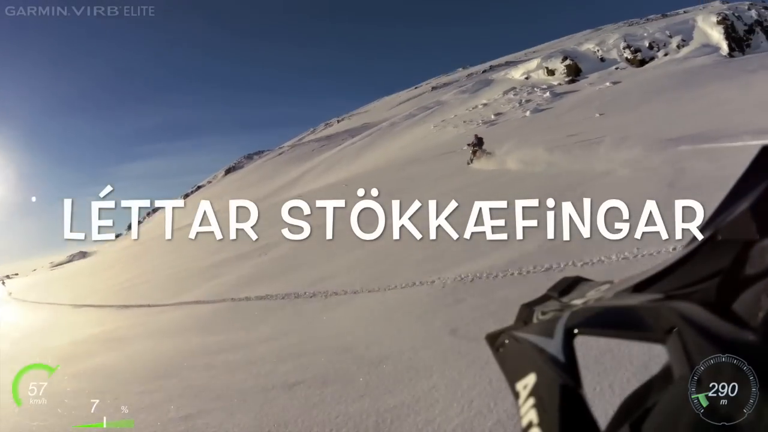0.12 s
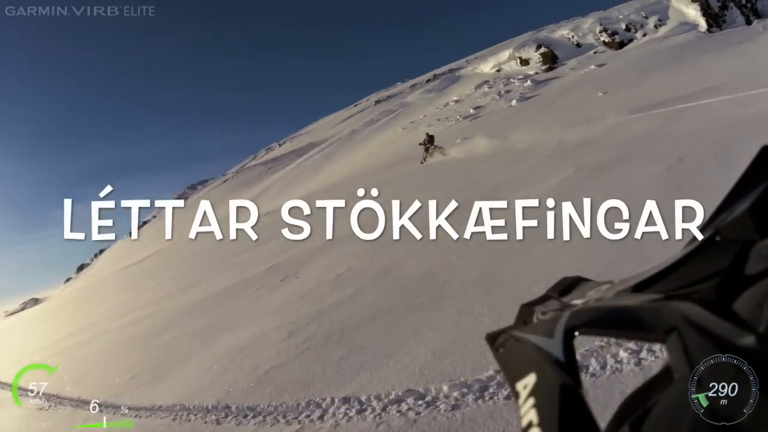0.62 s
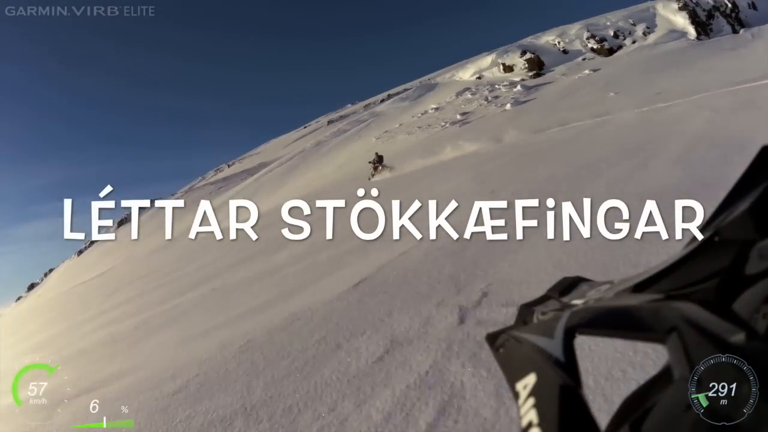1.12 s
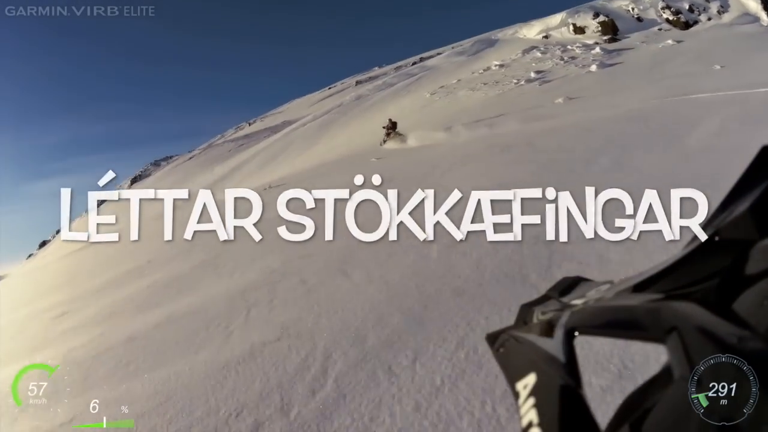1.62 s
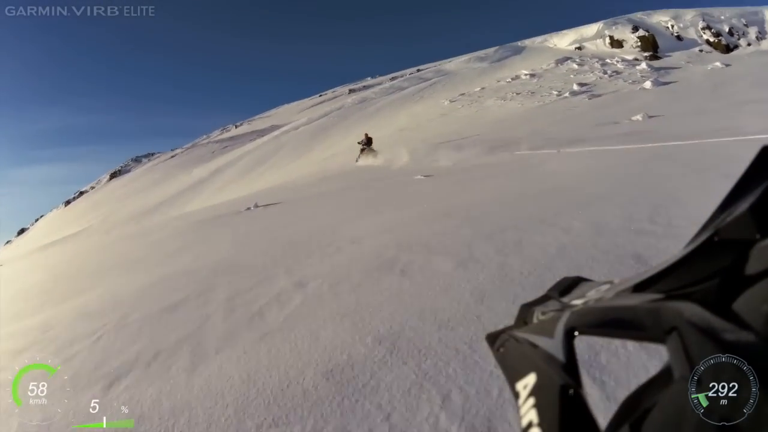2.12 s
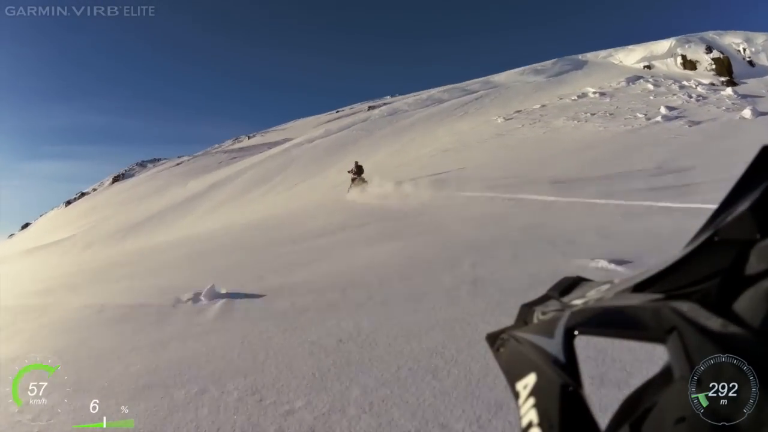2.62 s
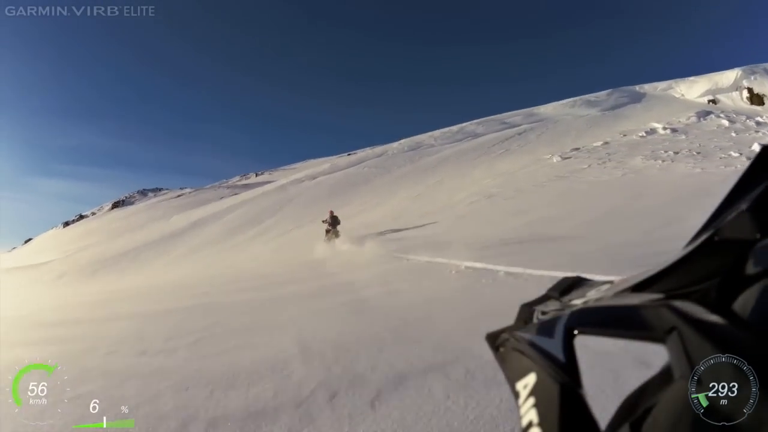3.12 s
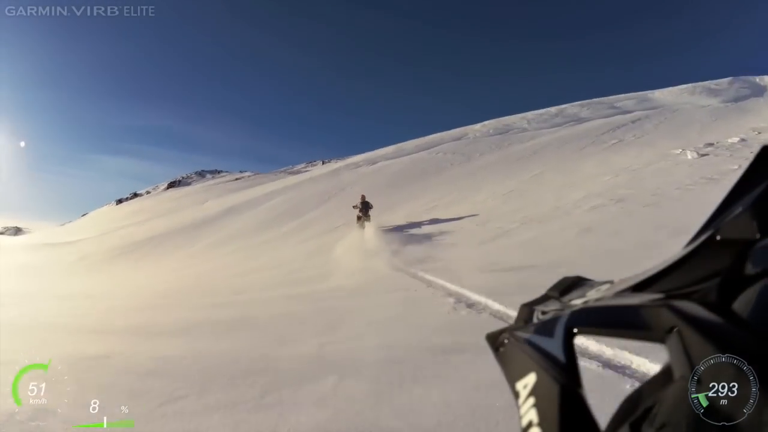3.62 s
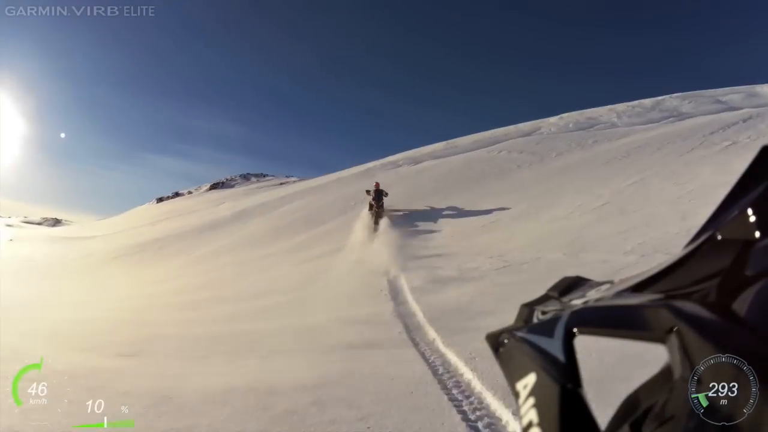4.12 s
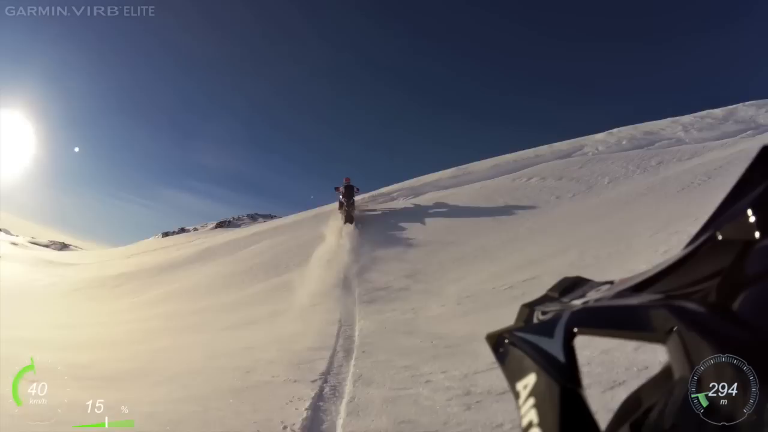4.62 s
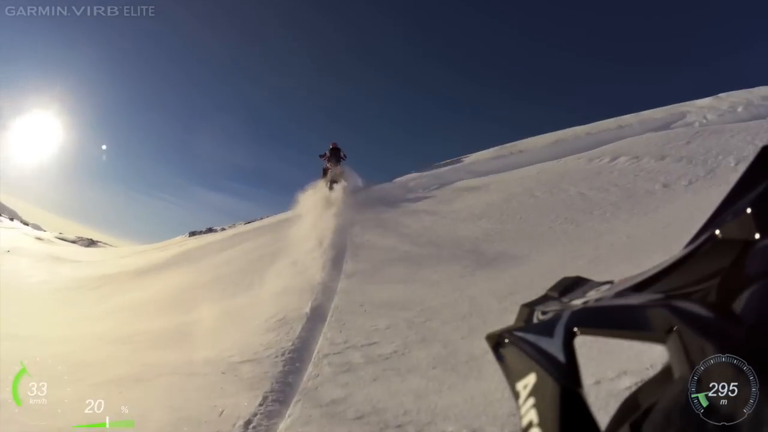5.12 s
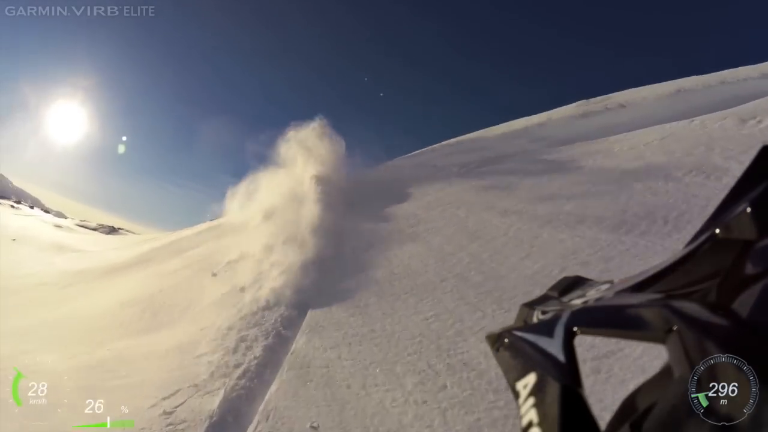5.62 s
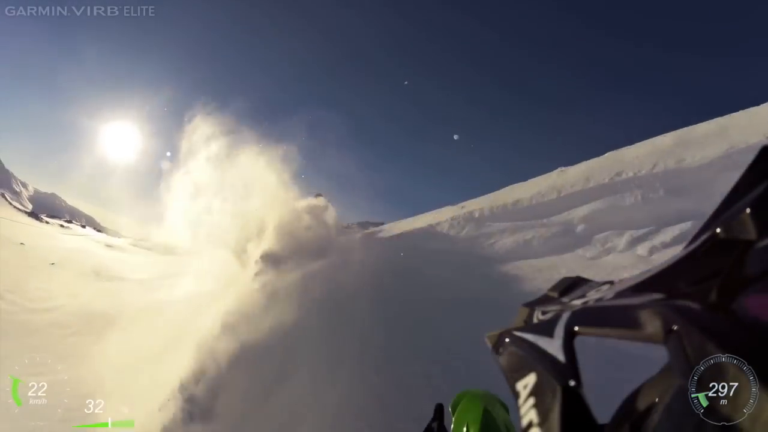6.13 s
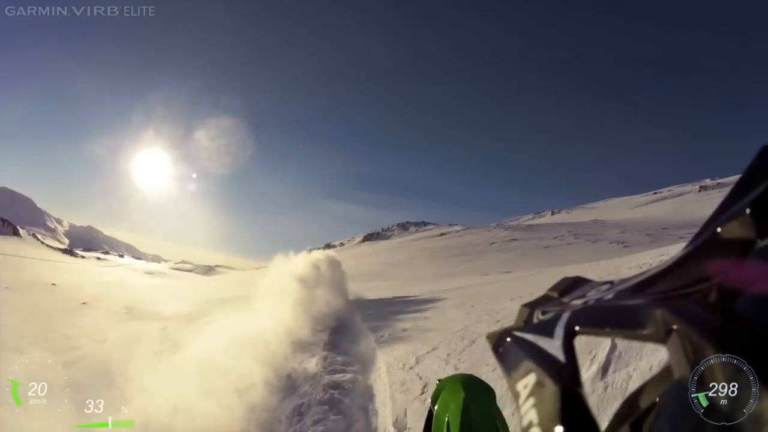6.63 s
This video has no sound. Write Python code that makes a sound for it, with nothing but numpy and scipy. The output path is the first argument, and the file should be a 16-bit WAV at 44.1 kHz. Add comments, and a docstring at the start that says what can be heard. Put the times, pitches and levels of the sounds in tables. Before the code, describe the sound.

A single-cylinder snow bike engine drones and climbs, drops off throttle, sputters unevenly, then pulls again under heavy buffeting head wind.

```python
"""Snow bike in a head wind

A single-cylinder four-stroke engine pulls, coasts off the throttle and pulls again, heard inside a closed housing.
Firing pulses and gas noise ring resonances as its bark; cosines make the drone, shaped noise the whirr and cracks.
The head wind is patchy coloured noise with slaps and an edge roar; the overloaded input adds treble clicks.
The input squeezes the loudest sounds and cuts off the highest peaks."""
import sys
import numpy as np
from scipy import signal
from scipy.fft import rfft, irfft, next_fast_len
from scipy.io import wavfile

SR = 44100
rng = np.random.default_rng(int(sys.argv[2]) if len(sys.argv) > 2 else 0)


def store_pcm(level_fs):
    """Save levels as 16-bit WAV."""
    pcm = np.round(np.clip(level_fs, -1, 1) * 32767).astype(np.int16)
    wavfile.write(sys.argv[1], SR, np.atleast_2d(pcm).T)


def nominal_scale(level):
    """Amplitude ratio for a level in decibels (scalar or array-like)."""
    x = np.asarray(level, float) / 20
    return 10 ** x


N = 298116


def rms_one(x):
    """Scales a sound to an rms of 1."""
    return x / np.sqrt(np.mean(x ** 2) + 1e-20)


def in_time(rows):
    """Joins the columns of a table by straight lines in time."""
    s, *columns = np.transpose(rows)
    return [np.interp(np.arange(N) / SR, s, column) for column in columns]


def at_hz(points, hz):
    """Reads a (frequency, level) table on a log-frequency axis."""
    table_hz, level_db = np.transpose(points)
    return np.interp(np.log(hz), np.log(table_hz), level_db)


def drift(rate_hz):
    """Slow random wandering of rms 1: noise smoothed twice, made at every 40th sample."""
    r = np.exp(-2 * np.pi * rate_hz * 40 / SR)
    noise = rng.standard_normal(N // 40 + 2002)
    slow = signal.lfilter([1], [1, -2 * r, r * r], noise)[2000:]   # skip the filter's start
    return np.interp(np.arange(N) / 40, np.arange(len(slow)), rms_one(slow))


def resonance(x, hz, width_hz):
    """Something that rings at one pitch: a two-pole peak with gain 1 on top."""
    r = np.exp(-np.pi * width_hz / SR)
    poles = [1, -2 * r * np.cos(2 * np.pi * hz / SR), r * r]
    return signal.lfilter([(1 - r * r) / 2, 0, (r * r - 1) / 2], poles, x)


def low_pass(x, order, hz):
    """Dulls a sound above the given frequency."""
    return signal.sosfilt(signal.butter(order, hz, fs=SR, output="sos"), x)


def turbulence(spectrum, eddies_db, patchy_db):
    """Coloured noise in octave bands: all share the passing eddies, each also flickers on its own."""
    size = next_fast_len(N)
    hz = np.fft.rfftfreq(size, 1 / SR) + 1e-3
    noise = nominal_scale(at_hz(spectrum, hz)) * rfft(rng.standard_normal(N), size)
    octaves = np.clip(np.log2(hz), 5, 13)
    out = 0
    for octave in np.arange(5, 14):
        share = np.clip(1 - np.abs(octaves - octave), 0, 1)   # neighbouring bands overlap
        band = irfft(noise * share, size)[:N]
        out = out + band * nominal_scale(patchy_db * drift(2.3))
    return rms_one(out * nominal_scale(eddies_db))


# engine speed: (time [s], firing rate [1/s])
ENGINE_SPEED = [(0, 62), (.2, 60.5), (.44, 66.6), (.71, 68.8), (.95, 73.8), (1.17, 74.5), (1.39, 71.6),
                (1.62, 72.5), (1.82, 79), (2.0, 77), (2.21, 73.7), (2.45, 77), (2.53, 77.2), (2.86, 76.6),
                (2.96, 70.6), (3.07, 69.6), (3.35, 65), (4.04, 46), (4.6, 50.1), (5.08, 41), (5.45, 45),
                (5.6, 56), (5.79, 53.4), (5.97, 52.4), (6.08, 54.7), (6.252, 62.8), (6.488, 62.4),
                (6.674, 66.8), (6.76, 66.9)]
# engine load: (time [s], level of the firing [dB], extra level of the intake drone [dB])
ENGINE_LOAD = [(0, -30, -6), (.75, -26, -2), (1.85, -23, 2), (2.3, -22.5, 1), (2.5, -22.5, 0),
               (2.85, -23, -1), (2.91, -31, 3), (3.12, -32, 2), (3.28, -41, 12), (3.5, -41, 8),
               (4.35, -38, -1), (5.05, -40, 3), (5.2, -33, -4), (5.45, -40, -5), (5.63, -29, -6),
               (5.86, -28.5, -1), (6.0, -24.5, -1), (6.17, -28.5, 5), (6.3, -31, 4), (6.44, -30.5, -4),
               (6.57, -29.5, 4), (6.76, -30, -1)]
# throttle: (time [s], opening [0-1], uneven burning [0-1])
THROTTLE_HAND = [(0, 1, .1), (2.86, 1, 0), (2.9, 0, 0), (3.25, 0, 0), (3.4, 0, 1), (4.0, .6, 1),
                 (5.5, .6, 1), (5.62, 1, .6), (5.85, 1, .4), (5.97, 1, .25), (6.25, 1, .05), (6.76, 1, 0)]


def riding():
    """How the engine is ridden: the firing count with a slight wobble in speed, the load and the throttle."""
    firing_hz, = in_time(ENGINE_SPEED)
    load_db, intake_db = in_time(ENGINE_LOAD)
    throttle, uneven = in_time(THROTTLE_HAND)
    cycle = np.cumsum(firing_hz * (1 + .0015 * drift(6.0))) / SR - .37
    return cycle, firing_hz, load_db, intake_db, throttle, uneven


# exhaust and bodywork rung by each firing: (frequency [Hz], width [Hz], relative level [dB])
EXHAUST_MODES = [(310, 220, -8), (590, 130, -2), (790, 90, -1), (1090, 130, -3), (1310, 150, -4),
                 (1870, 260, -10), (2420, 380, -18), (2950, 400, -19)]


def bark(cycle, firing_hz, uneven, puff, puff_s, uneven_db, late_s):
    """Each firing sends a pulse and a dying puff of gas noise into the resonances; part throttle burns unevenly."""
    low_pipe_hz, rasp_hz = 900, 1400   # upper limits of the low pipe resonances and of the middle ones
    at = np.flatnonzero(np.diff(np.floor(cycle)))
    chance = rng.standard_normal((len(at), 2))
    slack = 1 + 3 * uneven[at]
    late = np.clip(at + late_s * SR * slack * chance[:, 0], 0, N - 1).astype(int)
    pulses = np.zeros(N)
    pulses[late] = nominal_scale(uneven_db * slack * chance[:, 1])
    fade = np.exp(-1 / (puff_s * SR))
    gas = signal.lfilter([1], [1, -fade], pulses) * rng.standard_normal(N)
    push = rms_one(pulses) + puff * rms_one(gas) * [[1], [2.8]]   # more gas noise for the rasp
    push = low_pass(push, 4, 1530)   # the housing wall
    hot = np.interp(firing_hz, [60, 74], [0, 1])
    out = 0
    for k, (hz, width_hz, db) in enumerate(EXHAUST_MODES):
        lag_s = .0009 * max(np.log2(hz / rasp_hz), 0)   # higher rasp resonances speak later
        drive = np.roll(push[int(hz > rasp_hz)], round(lag_s * SR))
        rung = resonance(drive, hz, width_hz)
        if low_pipe_hz < hz < rasp_hz:   # slower running cools the gas, so the pitch sags
            cool = resonance(drive, .91 * hz, width_hz)
            rung = hot * rung + (1 - hot) * cool
        sign = -1 if hz < low_pipe_hz else (-1) ** k   # the low ones start together, with a suction
        out = out + sign * nominal_scale(db) * rung
    return rms_one(out)


# drone: (multiple of the firing rate, level on throttle [dB], level coasting [dB])
DRONE_ORDERS = [(2, -11, -1.5), (3, .5, -1), (4, -10, 9), (5, 0, -16.5), (6, -11, -7.5)]
# colour given by the airbox: (frequency [Hz], gain [dB])
AIRBOX_COLOUR = [(110, 7), (170, -8), (225, 2), (270, -7), (330, 3.5), (400, 0.5), (480, -2)]


def drone(cycle, firing_hz, throttle):
    """Low multiples of the firing rate as cosines through the airbox; their balance shifts with the throttle."""
    lagged = cycle - .0006 * firing_hz   # all dip together 0.6 ms after each firing
    out = 0
    for multiple, open_db, shut_db in DRONE_ORDERS:
        multiple = round(multiple)
        level_db = throttle * open_db + (1 - throttle) * shut_db
        level_db = level_db + at_hz(AIRBOX_COLOUR, multiple * firing_hz) + 1.6 * drift(10.0)
        out = out - nominal_scale(level_db) * np.cos(2 * np.pi * multiple * lagged)
    return np.sqrt(2) * out


# colour of the whirr: (frequency [Hz], relative level [dB per Hz])
WHIRR_SPECTRUM = [(1000, 2.5), (2000, 8.5), (3000, -3), (4200, -4.5), (4800, -14), (5400, -20.5),
                  (7000, -28), (13000, -60)]
# drive effort: (time [s], level of the whirr [dB])
DRIVE_EFFORT = [(0, -43.5), (1.2, -36.5), (2.2, -42), (3.3, -44), (4.2, -49), (5.0, -51), (5.6, -51),
                (5.95, -45), (6.27, -44.5), (6.5, -42.5), (6.76, -45.5)]


def whirr(cycle, rush_db, throttle):
    """Valve gear and chain as noise, louder with effort and air over the chain; throbs with crank and firing."""
    throb_db = 1.8 * np.cos(4 * np.pi * cycle) + 2.0 * np.cos(2 * np.pi * cycle)
    air_db = 0.15 * (rush_db - rush_db.mean())
    gear = nominal_scale(air_db) * turbulence(WHIRR_SPECTRUM, throb_db, patchy_db=1.5)
    # a cover rings with the valve gear under throttle
    cover = rng.standard_normal(N)
    for _ in range(2):
        cover = resonance(cover, hz=5300, width_hz=540)
    cover_db = -31.5 + throb_db + 3.0 * drift(3.0)
    return nominal_scale(in_time(DRIVE_EFFORT)[0]) * (gear + throttle * nominal_scale(cover_db) * rms_one(cover))


# hard single firings at part throttle that crack in the bodywork: (time [s], strength [dB])
HARD_FIRINGS = [(4.324, -29), (4.35, -21.5), (4.6253, -33), (5.047, -34), (5.075, -33), (5.101, -30),
                (5.124, -27), (5.1532, -23.5), (5.2038, -24), (5.25, -26.5), (5.2728, -39)]
# bodywork rung by a crack: (frequency [Hz], width [Hz], relative level [dB])
BODYWORK_MODES = [(1570, 400, -1), (2360, 370, -6), (3200, 780, -13), (4780, 900, -14)]


def cracks():
    """Each crack is a dying rattle that rings the bodywork, each time in another balance, dulled by the housing."""
    s, strength_db = np.transpose(HARD_FIRINGS)
    chance = rng.standard_normal((len(s), len(BODYWORK_MODES)))
    rattle = .003 * SR   # samples in which a rattle dies to 1/e
    out = 0
    for k, (hz, width_hz, db) in enumerate(BODYWORK_MODES):
        hits = np.full(N, 1e-18)
        hits[(s * SR).astype(int)] = nominal_scale(strength_db + db + 3.5 * chance[:, k])
        fading = signal.lfilter([1], [1, -np.exp(-1 / rattle)], hits)
        noise = fading * rng.standard_normal(N) / np.sqrt(rattle / 2)
        out = out + resonance(noise, hz, width_hz) * SR / (2 * np.pi * width_hz)
    return low_pass(out, 5, 3500)


# head wind, its rush strong while the port faces into it: (time [s], buffet level [dB], rush level [dB])
WIND_LEVELS = [(0, -23, -13), (.5, -22.5, -19), (1.0, -27.5, -16), (1.5, -22, -12.5), (1.75, -18.5, -15.5),
               (2.3, -19, -18), (2.5, -18, -28), (2.9, -21, -34), (3.25, -23.5, -37), (3.75, -19.5, -37.5),
               (4.8, -22.5, -32.5), (5.1, -22, -37), (5.55, -21, -33), (5.9, -26, -31.5), (6.2, -26.5, -35),
               (6.76, -26, -32.5)]
# gusts: (peak time [s], buffet swell [dB], rush swell [dB], length [s])
WIND_GUSTS = [(0.723, 4.5, 0, 0.094), (1.193, 6, 3, 0.24), (1.37, 5.5, 3.5, 0.33), (1.704, 5.5, -2, 0.058),
              (1.981, 7.5, -4, 0.084), (2.347, 0, 0, 0.086), (2.502, 0, 8, 0.11), (3.213, 8, 0.5, 0.053),
              (3.332, 5.5, 4.5, 0.2), (3.463, 6.5, 6.5, 0.4), (3.81, 3.5, 7, 0.069), (3.902, 4.5, 1, 0.21),
              (4.27, -4.5, 7.5, 0.043), (4.762, 2, -2.5, 0.33), (5.195, 1, 10, 0.3), (5.524, 1, -4, 0.05),
              (6.478, 6, 5.5, 0.092)]


def head_wind():
    """Levels of buffet and rush in dB: steady wind plus gusts that come a little faster than they go."""
    levels_db = np.array(in_time(WIND_LEVELS))
    rise = 0.41   # share of a gust's length before its peak
    for s, buffet_db, rush_db, length in WIND_GUSTS:
        corners = [s - rise * length, s, s + (1 - rise) * length]
        shape = np.interp(np.arange(N) / SR, corners, [0, 1, 0])
        levels_db = levels_db + np.outer([buffet_db, rush_db], shape)
    return levels_db


# colour of the buffeting: (frequency [Hz], relative level [dB per Hz])
BUFFET_SPECTRUM = [(25, -37), (50, -5.5), (100, 2), (160, 5), (300, 3.5), (500, -2.5), (900, -25),
                   (2000, -56.5), (5000, -98.5)]


def buffeting(buffet_db, eddies):
    """The wind's low rumble: noise shaken by the shared eddies and by a slower drift of its own."""
    shaking_db = 0.71 * eddies + 0.88 * drift(14.0)
    return nominal_scale(buffet_db) * turbulence(BUFFET_SPECTRUM, shaking_db, patchy_db=0.68)


# colour of the rush: (frequency [Hz], relative level [dB per Hz])
RUSH_SPECTRUM = [(60, -43), (200, -8), (400, 1), (650, 2), (1000, -5), (1600, -15), (2500, -27),
                 (4000, -46), (7000, -86), (13000, -110)]


def rushing(rush_db, eddies):
    """Air rushing over the housing: higher noise shaken by the shared eddies."""
    return nominal_scale(rush_db) * turbulence(RUSH_SPECTRUM, 1.0 * eddies, patchy_db=.9)


# single eddies that slap the port: (time [s], strength [dB])
STRONG_SLAPS = [(3.314, -8.5), (3.463, -13), (3.52, -18), (3.615, -14), (3.668, -13), (4.138, -17),
                (4.186, -13), (4.254, -10.5), (4.31, -16), (4.406, -14.5), (4.488, -20), (4.587, -11),
                (4.682, -11.5), (4.821, -29), (4.872, -21), (5.562, -21), (5.746, -13), (5.826, -14)]


def slaps(buffet_db, per_s, small_db, cavity_hz, width_hz):
    """Eddies slap the microphone port, many small ones at random and a few strong; the cavity rings briefly."""
    sizes = nominal_scale(3.32 * np.minimum(rng.exponential(1, N), 4)) * rng.choice([-1, 1], N)
    hits = sizes * (rng.random(N) < per_s / SR) * nominal_scale(buffet_db + small_db)
    for s, strength_db in STRONG_SLAPS:
        hits[round(s * SR)] = nominal_scale(strength_db)
    soft = low_pass(hits + 1e-18, 3, 1100)
    return resonance(soft, cavity_hz, width_hz) * SR / (np.pi * width_hz)


# air over the edge of the housing: (time [s], level [dB])
EDGE_LEVEL = [(0, -26), (.3, -41.5), (.8, -43.5), (1.1, -23), (1.35, -19.5), (1.6, -33.5), (2.2, -36.5),
              (2.6, -41), (6.76, -60)]


def edge_roar(eddies):
    """A broad roar of air over the edge: noise twice through one wide resonance, shaken by the eddies."""
    roar = rng.standard_normal(N)
    for _ in range(2):
        roar = resonance(roar, hz=850, width_hz=600)
    roar = low_pass(roar, 4, 4200)   # the housing wall
    return nominal_scale(in_time(EDGE_LEVEL)[0] + 0.62 * eddies) * rms_one(roar)


# sharp clicks of the overloaded input: (time [s], strength [dB])
OVERLOAD_CLICKS = [(0.0767, -50), (0.1675, -54), (0.5806, -47), (0.733, -53), (0.817, -42.5), (0.8605, -41),
                   (1.129, -53), (1.1588, -53), (1.2117, -45.5), (1.2256, -38.5), (1.2665, -40.5),
                   (1.37, -44), (1.3893, -43), (1.444, -44), (1.486, -39), (1.6113, -43.5), (1.6344, -41),
                   (1.728, -42), (1.959, -55.5), (1.985, -58), (2.015, -61.5), (2.0278, -55.5),
                   (2.0752, -41.5), (2.148, -46.5), (2.269, -44), (2.376, -48), (2.5545, -48)]


def overload_clicks(rush_db):
    """Clicks of the overloaded input in a treble band, with fainter random ones that follow the rush."""
    s, strength_db = np.transpose(OVERLOAD_CLICKS)
    chosen = rng.random(N) < 50 / SR   # about 50 faint clicks a second
    hits = chosen * rng.standard_normal(N) * nominal_scale(rush_db - 20) + 1e-18
    hits[(s * SR).astype(int)] = nominal_scale(strength_db + 28.0) * rng.choice([-1, 1], len(s))
    return signal.sosfilt(signal.butter(2, [3500, 6050], "band", fs=SR, output="sos"), hits)


def scene():
    """Adds up the engine, the wind at the housing and the clicks of the input."""
    cycle, firing_hz, load_db, intake_db, throttle, uneven = riding()
    buffet_db, rush_db = head_wind()
    eddies = drift(24.0)   # shared by the layers of wind
    engine = nominal_scale(load_db) * bark(cycle, firing_hz, uneven, puff=.27, puff_s=.007, uneven_db=1.0, late_s=.00003)
    engine += nominal_scale(load_db + intake_db) * drone(cycle, firing_hz, throttle)
    engine += whirr(cycle, rush_db, throttle) + cracks()
    wind = buffeting(buffet_db, eddies) + rushing(rush_db, eddies)
    wind += slaps(buffet_db, per_s=49, small_db=-3.5, cavity_hz=282, width_hz=160)
    wind += edge_roar(eddies)
    return (engine + wind + overload_clicks(rush_db))[None]


def top_cut(x):
    """Nothing passes above the cut-off."""
    return signal.sosfilt(signal.butter(12, 13100, fs=SR, output="sos"), x)


def record(dry):
    """The input squeezes loud sounds, cuts off the highest peaks and softens both ends of the spectrum."""
    squeeze_top, overload_top = .9, .63   # full scale is 1
    squeezed = squeeze_top * np.tanh(dry / squeeze_top)
    cut = np.clip(squeezed, -overload_top, overload_top)
    mix = signal.sosfilt(signal.butter(1, [40, 6000], "band", fs=SR, output="sos"), cut)
    return top_cut(mix)


dry = scene()
out = record(dry)
store_pcm(out)
```